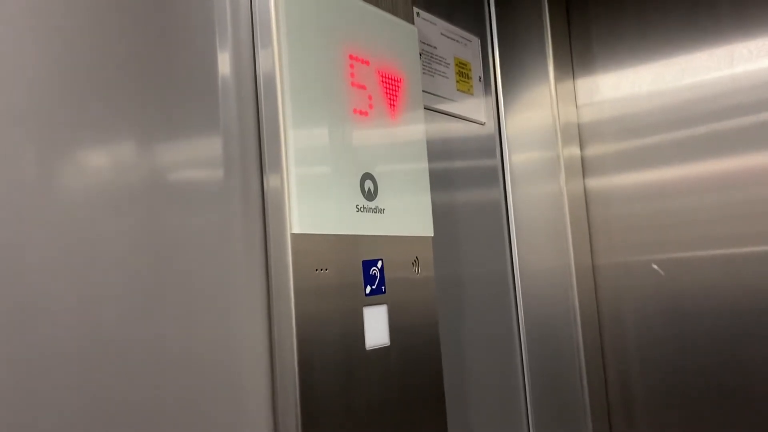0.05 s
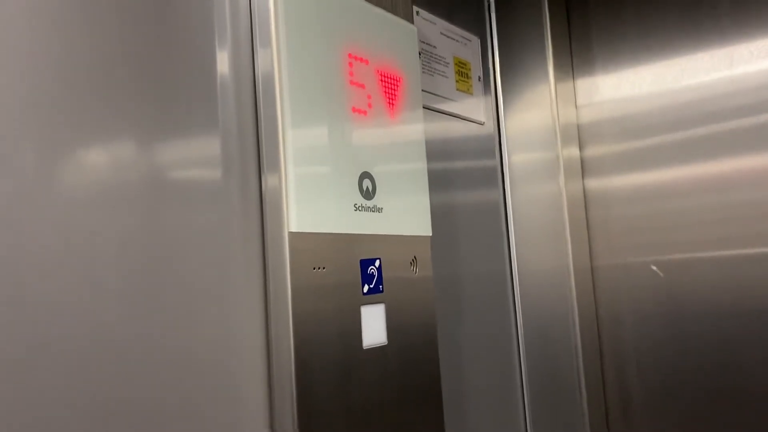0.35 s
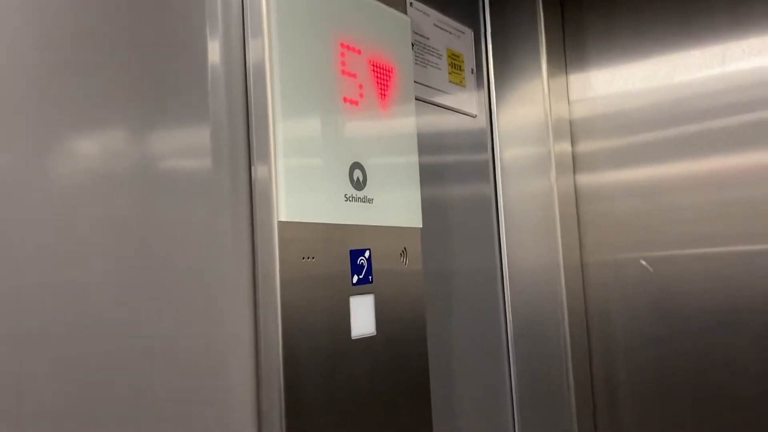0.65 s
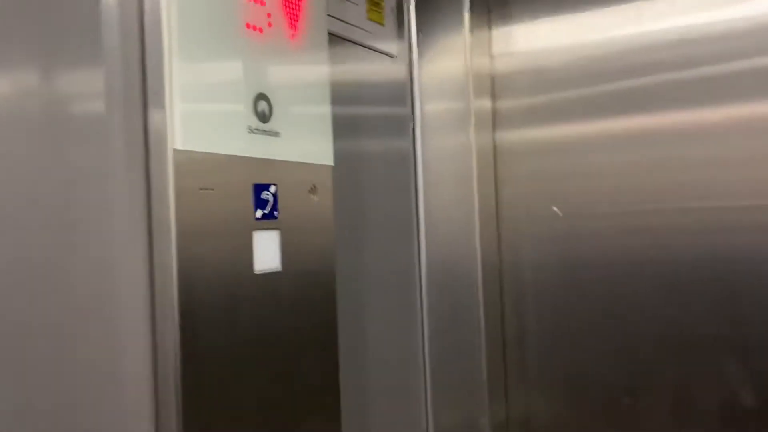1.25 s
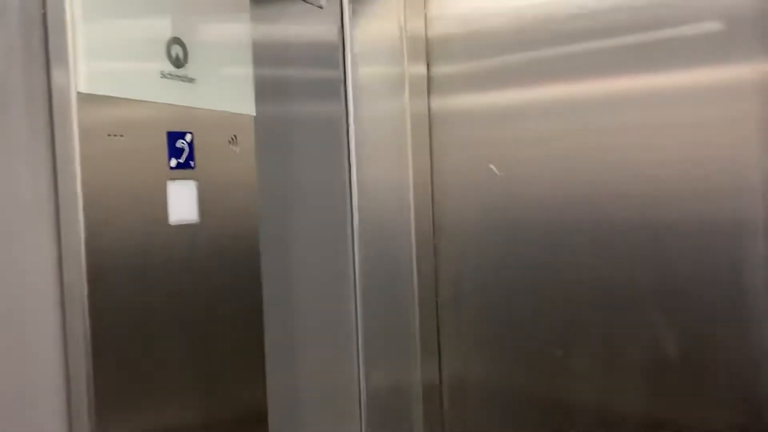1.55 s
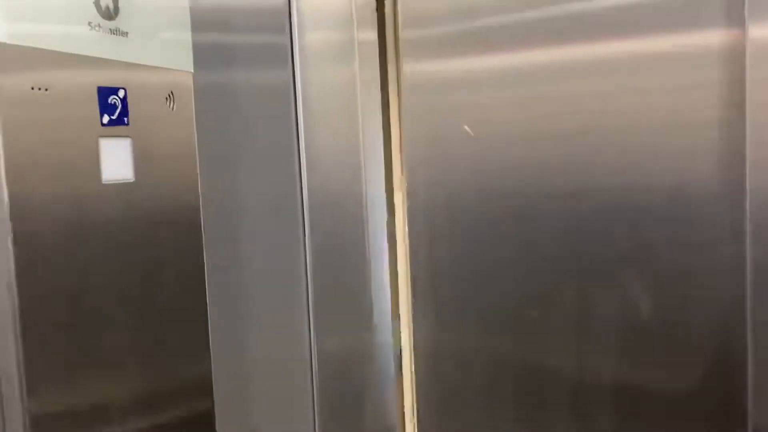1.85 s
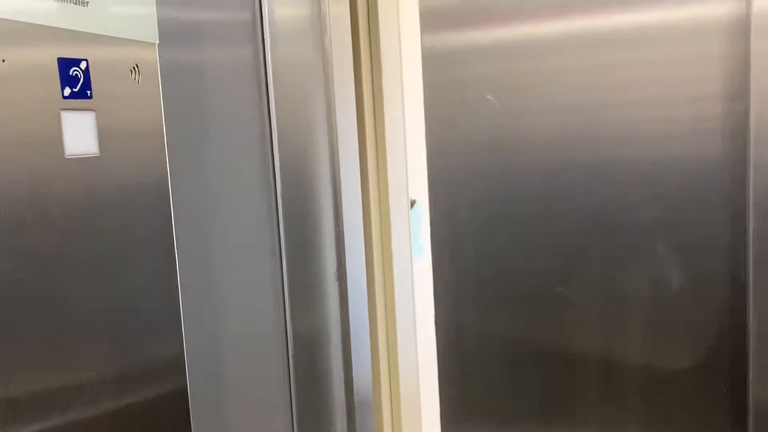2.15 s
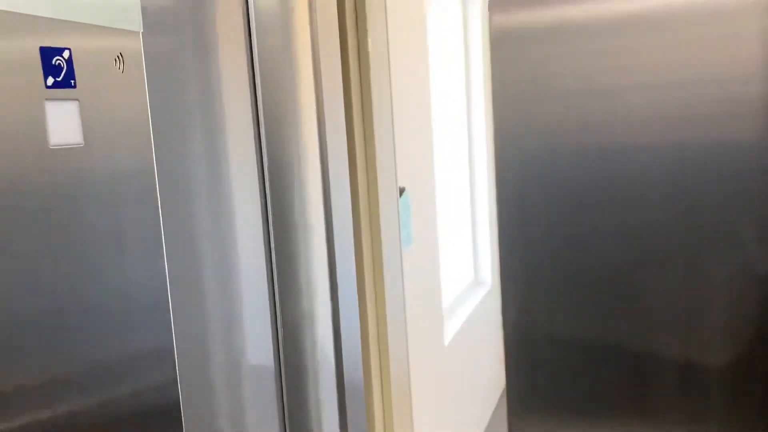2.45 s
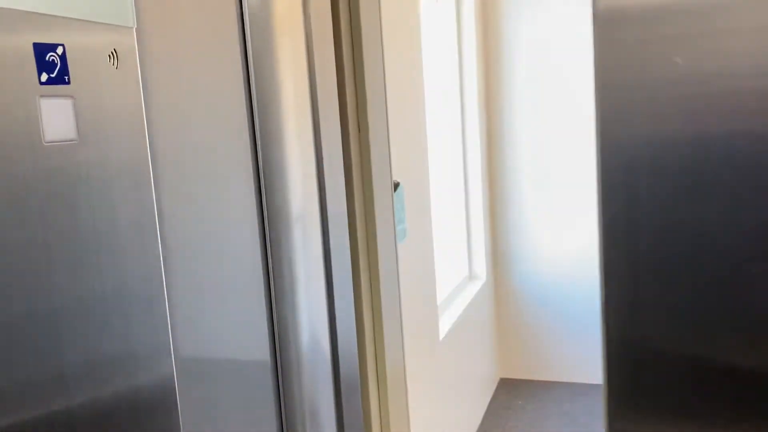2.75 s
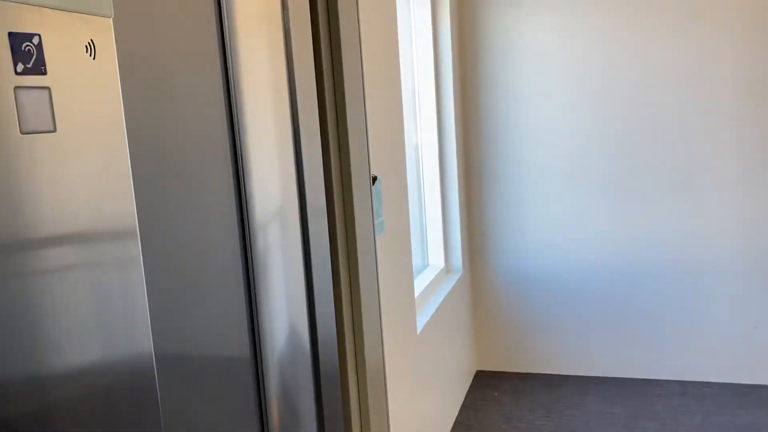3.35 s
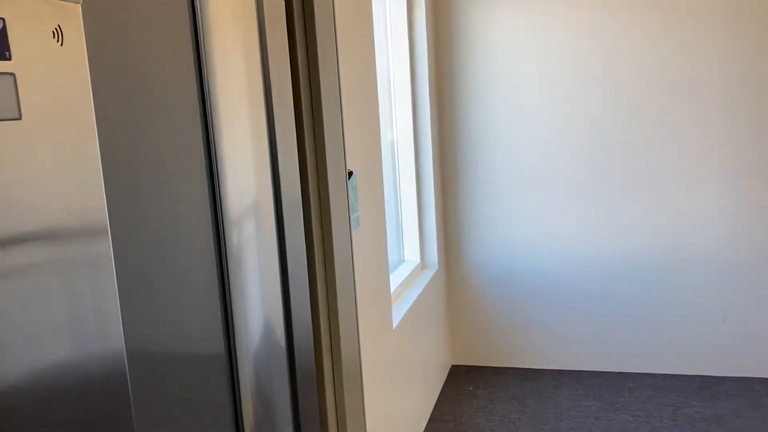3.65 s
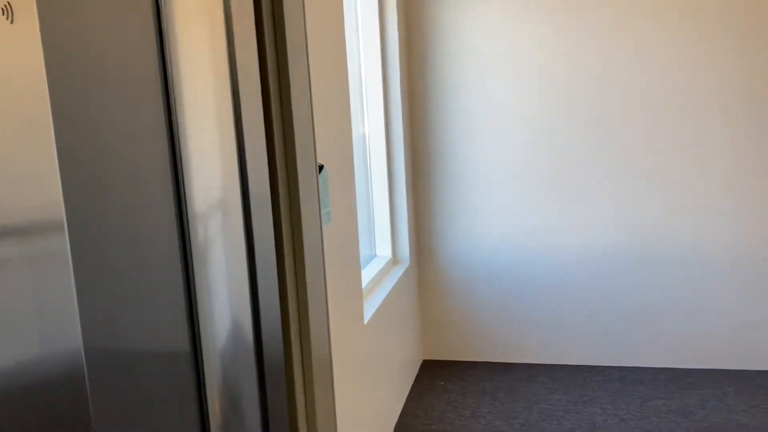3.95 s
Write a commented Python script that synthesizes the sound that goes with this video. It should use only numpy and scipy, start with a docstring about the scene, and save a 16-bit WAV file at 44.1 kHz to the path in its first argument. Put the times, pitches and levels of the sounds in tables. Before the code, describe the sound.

An elevator door rattles, squeals and slides open, heard from inside the humming steel car.

```python
"""A lift door rolls open, heard from inside the steel car: its motor whine, roller rumble and
sliding hiss rise and fall with its speed. Before that, the brake clunks shut, the car booms on
its ropes, and the door drive takes up with a falling squeal and rattles the lock free.
A fan hums throughout, and the steel walls add a short echo."""
import sys
import numpy as np
from scipy import signal
from scipy.fft import rfft, irfft
from scipy.io import wavfile
from scipy.ndimage import uniform_filter1d

SR = 44100
rng = np.random.default_rng(int(sys.argv[2]) if len(sys.argv) > 2 else 0)


def unload_audio(sound):
    """Save the sound as a 16-bit wav file, at the path given as the first command line argument."""
    columns = np.transpose(np.atleast_2d(sound))
    # keep every value between -1 and 1, then stretch to whole-number steps
    steps = np.round(np.clip(columns, -1, 1) * 32767)
    wavfile.write(sys.argv[1], SR, steps.astype(np.int16))


N = 176400
T = np.arange(N) / SR
HZ = np.fft.rfftfreq(N, 1 / SR) + 1e-3

# The tone colour of hiss. Each row: frequency in Hz, relative level in dB.
HISS_SPECTRUM = [(400, -21), (1000, 10), (2000, 10.5), (3500, 5.5), (5000, 3), (7000, 1.5), (10500, 1.5),
                 (11800, 3.5), (13600, -12), (15500, -5)]
# The brake shoes touch, strike and settle. Each row: peak in seconds, level in dB, spread in seconds.
BRAKE_HITS = [(0.392, -39, 0.0051), (0.405, -32.5, 0.0078), (0.425, -37, 0.02)]
BRAKE_SHUT_S = BRAKE_HITS[1][0]


def amp(db):
    """Turn decibels into a gain."""
    return 10 ** (np.asarray(db) / 20)


def unit(x):
    """Scale a signal to an average power of 1."""
    return x / np.sqrt(np.mean(x ** 2))


def curve(rows, axis=1):
    """Join one column of a table by straight lines in time."""
    rows = np.array(rows)
    return np.interp(T, rows[:, 0], rows[:, axis])


def across(rows):
    """Spread rows of frequency and value over all frequencies."""
    rows = np.array(rows)
    return np.interp(np.log(HZ), np.log(rows[:, 0]), rows[:, 1])


def colour(x, rows):
    """Shape white noise to a spectrum, keeping its power."""
    return irfft(rfft(x) * unit(amp(across(rows))), N)


def resonate(x, hz, width):
    """A resonance: frequencies near hz pass, the rest are weakened."""
    return irfft(rfft(x) / (1 + 1j * (HZ ** 2 - hz ** 2) / (HZ * width)), N)


def walk(rate_hz):
    """A smooth random wobble, about 1 in size."""
    return unit(irfft(rfft(rng.standard_normal(N)) * np.exp(-(HZ / rate_hz) ** 2), N))


def diffuse():
    """White stereo noise, alike on both sides in the bass and mostly unrelated in the treble."""
    # How alike left and right are. Each row: frequency in Hz, likeness (1 is the same, 0 unrelated).
    likeness = [(60, 1), (110, 0.8), (200, 1.03), (380, 0.27), (700, 0.26), (1300, -0.08), (2400, 0.16),
                (4400, 0.46), (8000, -0.04), (15000, 0.13)]
    alike = np.clip(across(likeness), -.99, .99)
    mid, side = rfft(rng.standard_normal((2, N))) * np.sqrt([(1 + alike) / 2, (1 - alike) / 2])
    return irfft(np.array([mid + side, mid - side]), N)


def even(x, span_s=0.121):
    """Even out slow swells, holding the power near 1."""
    power = np.mean(np.atleast_2d(x) ** 2, axis=0)
    return x / np.sqrt(uniform_filter1d(power, int(span_s * SR)) + 1e-12)


def tone(hz):
    """A sine wave of power 1 on a moving pitch."""
    return np.sqrt(2) * np.sin(2 * np.pi * np.cumsum(hz) / SR)


def fade(start, t60):
    """Start suddenly, then die away; the fade time t60 is the seconds taken to fall 60 dB."""
    return (T >= start) * np.exp(-np.log(1000) * np.maximum(T - start, 0) / t60)


def ring(start, hz, db, t60):
    """The fading note of a struck part."""
    return amp(db) * fade(start, t60) * np.sin(2 * np.pi * hz * (T - start))


def swell(centre, spread):
    """A bell-shaped rise and fall."""
    return np.exp(-.5 * ((T - centre) / spread) ** 2)


def strike(at, rise, t60):
    """Rise quickly to a peak, then die away."""
    return swell(at, rise) * (T < at) + fade(at, t60)


def grit(spread_db):
    """Stereo noise broken into tiny contacts of uneven size."""
    return unit(diffuse() * amp(spread_db * walk(610)))


def rubbed(hz, width):
    """A resonance kept ringing by rough contact."""
    return unit(resonate(resonate(diffuse(), hz, width), hz, width))


def car_echo():
    """Dense reflections between the steel walls; the treble dies first."""
    noise = diffuse()
    low = irfft(rfft(noise) / (1 + (HZ / 1500) ** 2), N)
    tail = (low * fade(0.00265, t60=0.67) + (noise - low) * fade(0.00233, t60=0.28))[:, :SR]
    return tail / np.sqrt(np.sum(tail ** 2) / 2)


def in_car(x, echo, wet):
    """Add the echo, with strength wet, at about the same total power."""
    reflections = signal.fftconvolve(np.atleast_2d(x)[:1], echo, axes=1)[:, :N]
    return (x + wet * reflections) / np.hypot(1, wet)


def ventilation():
    """Fan noise and a wavering hum; once the brake has shut, the door drive adds a faint hiss."""
    # The rush of air. Each row: frequency in Hz, relative level in dB.
    fan_spectrum = [(50, 3), (130, -1.5), (190, -4), (225, -7), (320, -2), (420, -7.5), (540, -2.5),
                    (750, -17), (1100, -17.5), (2500, -28), (5000, -41.5), (12000, -53)]
    # The hum swells and sinks. Each row: time in seconds, level in dB.
    hum_levels = [(0, -58.5), (.4, -55), (.75, -61), (.92, -53), (1.15, -40), (1.5, -51), (2.1, -56),
                  (2.75, -53), (2.98, -35.5), (3.25, -48), (4, -49.5)]
    hum = tone(299.5 * (1 + 0.0072 * walk(8.9))) * amp(curve(hum_levels) + 2 * walk(26))
    hiss = colour(diffuse(), HISS_SPECTRUM) * amp(-68) * (T > BRAKE_SHUT_S)
    return amp(-47) * colour(diffuse(), fan_spectrum) + hum + hiss


def tick(at_s=.2385):
    """One small dry tick close by."""
    # The tick's snap. Each row: frequency in Hz, relative level in dB.
    snap_spectrum = [(300, -1), (1200, 8), (3000, -4), (5000, -21), (9000, -34), (15000, -30)]
    snap = colour(diffuse(), snap_spectrum) * fade(at_s, t60=0.0076)
    return amp(-35) * snap + ring(at_s, hz=345, db=-32, t60=0.034)


def boom():
    """The car body rumbles around its lowest air resonance and takes a few thuds."""
    # The rumble's tone colour. Each row: frequency in Hz, relative level in dB.
    rumble_spectrum = [(20, -24), (31, -14), (42, -7.5), (58, -2.5), (70, -6.5), (88, -4.5), (100, -4.5),
                       (125, -17.5), (200, -30.5), (400, -95)]
    # The rumble's swells. Each row: time in seconds, level in dB.
    rumble_levels = [(0, -44), (.38, -50), (.48, -34), (.64, -30), (.73, -39), (1.05, -41), (1.15, -36),
                     (1.33, -40), (1.41, -29), (1.55, -30.5), (1.66, -31), (1.82, -28.5), (1.93, -37),
                     (2.05, -32), (2.2, -40), (2.4, -34), (3.6, -38), (3.78, -39), (3.9, -32.5), (4, -38)]
    # Thuds that shake the car. Each row: start in seconds, level in dB.
    thud_hits = [(0.484, -18.5), (1.146, -22), (1.288, -18.5), (1.443, -19), (1.496, -17), (1.535, -13.5)]
    rumble = even(colour(diffuse(), rumble_spectrum))
    air_note = amp(-4) * tone(90.45 * (1 + 0.034 * walk(14.1)))
    thuds = sum(ring(s, hz=73, db=db, t60=0.053) for s, db in thud_hits)
    return even(rumble + air_note) * amp(curve(rumble_levels)) + thuds


def brake(echo):
    """The brake closes with a short clatter and leaves steel parts ringing."""
    # The clatter. Each row: frequency in Hz, relative level in dB.
    clatter_spectrum = [(100, 8.5), (220, -11), (360, 6), (550, -3.5), (750, 0), (1050, -10), (1400, -15.5),
                        (2500, -14.5), (4500, -17.5), (7000, -22), (11000, -26.5), (15000, -42)]
    # The ringing parts. Each row: pitch in Hz, level in dB, fade time in seconds.
    steel_notes = [(318.5, -39.5, 0.59), (755, -39.5, 0.17), (1080, -53, .2), (5030, -58, 0.55),
                   (6100, -65, 0.55), (7000, -62, 0.35)]
    force = np.sqrt(sum((amp(db) * swell(s, spread)) ** 2 for s, db, spread in BRAKE_HITS))
    clatter = colour(grit(1.2), clatter_spectrum) * force
    ringing = sum(ring(BRAKE_SHUT_S, *note) for note in steel_notes)
    return in_car(clatter, echo, wet=1.45) + ringing


def linkage(echo):
    """Lock and hangers scrape and knock, shaking the door panel; hard contacts are brighter."""
    # The contact noise. Each row: frequency in Hz, relative level in dB.
    contact_spectrum = [(80, -12), (170, 0.5), (215, -11), (280, -6.5), (400, -3), (520, -7), (700, -7.5),
                        (1000, -7.5), (1500, -11), (2200, -17.5), (3500, -20.5), (5500, -30), (8000, -30.5),
                        (12000, -37.5), (15500, -52)]
    # The scraping. Each row: time in seconds, level in dB.
    scrape_levels = [(.88, -72), (.98, -53), (1.05, -42.5), (1.12, -43.5), (1.31, -47.5), (1.55, -39.5),
                     (1.7, -47), (1.9, -46.5), (2.2, -54), (2.5, -57), (4, -54)]
    # The knocks. Each row: peak in seconds, level in dB, fade time in seconds, extra treble in dB.
    knocks = [(1.088, -36.5, 0.13, 2), (1.104, -32, 0.15, -1.5), (1.133, -37, 0.21, 0.5),
              (1.235, -33, 0.34, -3.5), (1.344, -33, 0.11, 0), (1.382, -34, 0.16, -7), (1.44, -42, 0.53, 3),
              (1.523, -36.5, .2, -3), (1.553, -35, 0.14, -2), (1.59, -37, 0.1, -8),
              (2.372, -40.5, 0.1, 7.5), (2.389, -40.5, .11, 7.5), (2.635, -42, .1, 3), (2.79, -46, 0.3, 8),
              (2.954, -41, 0.073, 8), (2.974, -42.5, .09, 6.5), (3.3, -38.5, 0.17, 1),
              (3.543, -42, 0.095, 7.5)]
    # The panel's resonances. Each row: pitch in Hz, width in Hz, level over the knock in dB.
    panel_notes = [(173.5, 66, 4), (248.1, 15, 15.5), (309, 5.4, 4.5), (373.8, 14, 6.5), (503, 32, -1),
                   (604, 21, 4.5), (812, 54, -3), (1717, 38, 0.5)]
    split_hz, rise_s = 970, .002
    contact = even(colour(grit(4.4), contact_spectrum), span_s=0.0345)
    low = irfft(rfft(contact) / (1 + (HZ / split_hz) ** 4), N)
    scrape_power = amp(curve(scrape_levels)) ** 2 / 2
    low_power = sum((amp(db) * strike(s, rise_s, t60)) ** 2 for s, db, t60, _ in knocks)
    high_power = sum((amp(db + extra) * strike(s, rise_s, t60)) ** 2 for s, db, t60, extra in knocks)
    rattle = low * np.sqrt(scrape_power + low_power) + (contact - low) * np.sqrt(scrape_power + high_power)
    panel = sum(amp(db) * resonate(rattle, hz, width) for hz, width, db in panel_notes)
    return in_car(rattle + panel, echo, wet=0.97)


def squeal(echo):
    """A dry pivot catches several times, each rasping note ringing on; the lock squeaks as it lets go."""
    # The pivot's squeals. Each row: peak in seconds, pitch in Hz, glide in Hz per second,
    # level in dB, rise in seconds, fade time in seconds.
    catches = [(1.102, 4900, -150, -41.5, 0.014, .55), (1.118, 4735, -300, -42, 0.007, 0.1),
               (1.145, 4675, -150, -36, .007, .28), (1.195, 4420, -400, -43, 0.016, .25),
               (1.249, 4330, 300.5, -41, 0.027, 0.24), (1.3, 4437, 500, -43, .018, 0.3),
               (1.41, 4470, 0.5, -61, 0.023, 0.4), (1.435, 1720, 0.5, -48.5, 0.015, 0.33)]
    # The lock's resonances. Each row: pitch in Hz, width in Hz, level in dB.
    lock_notes = [(1433, 87, -43.5), (1700, 88, -49), (1920, 60, -52), (2500, 400, -50), (3350, 65, -51),
                  (3870, 220, -53.5), (4760, 40, -61), (5395, 62, -59)]
    pivot = 0
    for s, hz, glide, db, rise, t60 in catches:
        pitch = (hz + glide * np.clip(T - s, -.1, .2)) * (1 + .015 * walk(160))
        note = tone(pitch) + amp(-27) * tone(2 * pitch)
        rasp = amp(-5.5) * rubbed(hz, width=420)
        pivot = pivot + (note + rasp) * amp(db + 1.6 * walk(84)) * strike(s, rise, t60)
    squeak = sum(amp(db) * rubbed(hz, width) for hz, width, db in lock_notes)
    return in_car(pivot + squeak * strike(at=1.532, rise=0.022, t60=0.33), echo, wet=.6)


def groans():
    """The rollers groan in short, low, gliding notes."""
    # The groans. Each row: peak in seconds, pitch in Hz, glide in Hz per second, level in dB,
    # spread in seconds.
    notes = [(2.48, 250, 60, -40, .09), (2.5, 171, 0.5, -37, 0.051), (2.93, 127, 100, -34, 0.041),
             (3.1, 149, 140.5, -33.5, 0.037), (3.25, 171, 60.5, -33.5, 0.033),
             (3.521, 257.2, 0, -34.5, 0.048), (3.61, 153, -29.5, -31, 0.035)]
    return sum(amp(db) * tone(hz + glide * (T - s)) * swell(s, spread) for s, hz, glide, db, spread in notes)


def track_ring():
    """The door's track rings at two pitches, each swelling on its own."""
    # The track's resonances. Each row: pitch in Hz, width in Hz, base level in dB.
    notes = [(2543, 75, -55), (3420, 360, -58.5)]
    # Their swells. Each row: time in seconds, dB added to the lower note, dB added to the upper.
    swells = [(1.7, -6, -16), (2.0, -9, 2), (2.25, -2.5, 1), (2.36, 3, -7), (2.48, 3.5, -6), (2.68, -6, 0),
              (2.75, -1, 0), (2.81, 0, 7.5), (2.9, -7, -1), (3.1, -3, -4), (3.18, 4.5, -1), (3.25, 5.5, 6),
              (3.31, -2, 3), (3.39, 0.5, -4), (3.67, -16, -12), (3.77, -3, -3), (3.9, -22, -16)]
    return sum(amp(db + curve(swells, axis=k + 1)) * even(rubbed(hz, width), span_s=0.052)
               for k, (hz, width, db) in enumerate(notes))


def guide_shoes(speed):
    """The guide shoes scrape in patches, louder as the door goes faster."""
    # The scraping bands. Each row: pitch in Hz, width in Hz, level at top speed in dB.
    bands = [(1250, 290, -56.5), (1750, 180, -57), (2700, 650, -59.5), (4940, 180, -67.5),
             (5800, 120, -65.5), (6600, 450, -61.5), (7200, 700, -60)]
    return sum(amp(db + 4.2 * walk(8)) * rubbed(hz, width) for hz, width, db in bands) * speed ** 2


def door_drumming():
    """The door leaf, its sliding panel, drums more as it runs out."""
    # The leaf's resonances. Each row: pitch in Hz, width in Hz, relative level in dB.
    notes = [(133.4, 18, 1), (165.6, 32, 0.57), (255, 71, 0.39)]
    # The drumming. Each row: time in seconds, level in dB.
    levels = [(2.3, -65), (2.5, -37.5), (2.8, -42), (3.15, -36), (3.4, -40.5), (3.54, -38), (3.7, -39),
              (4.0, -45)]
    return even(sum(amp(db) * rubbed(hz, width) for hz, width, db in notes)) * amp(curve(levels))


def motor_whine(speed, echo):
    """The drive whines roughly: speed sets its pitch and effort sets its loudness."""
    # The drive's tones. Each row: pitch at top speed in Hz, base level in dB.
    notes = [(459, -38), (400.5, -44.5), (302.2, -49.5), (178.1, -46), (910, -58.5)]
    # How hard the drive works. Each row: time in seconds, added level in dB.
    effort = [(1.7, -20), (2.1, -19.5), (2.21, -1), (2.32, -2.5), (2.41, 3), (2.5, -5.5), (2.75, 0),
              (3.05, -5.5), (3.18, -9.5), (3.35, -2), (3.6, 0.5), (3.72, -20), (4.0, -12)]
    waver, roughness = .014, .45
    whine = sum(amp(db) * tone(hz * speed * (1 + waver * walk(35.2))) * (1 + roughness * walk(8.6))
                for hz, db in notes)
    return in_car(whine * amp(curve(effort)), echo, wet=.8)


def rollers(speed):
    """The rollers make a grainy rumble that grows with speed."""
    # The rumble. Each row: frequency in Hz, relative level in dB.
    spectrum = [(60, -8), (120, -10), (170, -3), (220, -4), (290, -3.5), (400, -5), (510, -5), (800, -12.5),
                (1150, -21.5), (1800, -25), (3000, -41), (5000, -57), (12000, -40)]
    return even(colour(grit(1.5), spectrum)) * amp(-34.5 + 0.47 * walk(1.7)) * speed ** 1.65


def sliding_hiss(speed):
    """Sliding makes a flickering hiss, heard even at low speed."""
    return colour(grit(1.55), HISS_SPECTRUM) * amp(-46.5 + .9 * walk(9.2)) * speed ** 0.44


def door(echo):
    """The door speeds up and slows down; its sounds fade in as it starts to move."""
    # The door's travel. Each row: time in seconds, speed as a share of the top speed.
    travel = [(1.58, .05), (1.75, .12), (1.92, .38), (2.1, .52), (2.2, .66), (2.3, .76), (2.41, .835),
              (2.52, .92), (2.66, .975), (2.88, .985), (3.06, 1), (3.26, .97), (3.36, .9), (3.47, .805),
              (3.6, .755), (3.75, .65), (4.0, .32)]
    speed = np.maximum(uniform_filter1d(curve(travel), SR // 12), 1e-3)
    moving = np.clip((T - travel[0][0]) / 0.19, 0, 1)
    rolling = motor_whine(speed, echo) + rollers(speed) + track_ring()
    return moving * (rolling + guide_shoes(speed) + door_drumming() + sliding_hiss(speed))


def scene():
    """All the sounds in the car together, leaning a little to the left."""
    # The lean. Each row: frequency in Hz, level of left over right in dB.
    lean = [(100, 0), (200, 3.5), (380, .5), (700, 2), (1300, -0.3), (4400, 3.5), (8000, 0.1)]
    echo = car_echo()
    mix = ventilation() + tick() + brake(echo) + boom()
    mix = mix + linkage(echo) + squeal(echo) + door(echo) + groans()
    return irfft(rfft(mix) * amp(np.array([[.5], [-.5]]) * across(lean)), N)


def record(dry):
    """Fade in quickly, then cut the deepest bass and the highest treble."""
    fade_in = np.minimum(T / .012, 1) ** 2
    bass_cut = signal.butter(6, 34, "high", fs=SR, output="sos")
    treble_cut = signal.ellip(10, .2, 80, 15800, fs=SR, output="sos")
    return signal.sosfilt(treble_cut, signal.sosfilt(bass_cut, dry * fade_in))


dry = scene()
out = record(dry)
unload_audio(out)
```